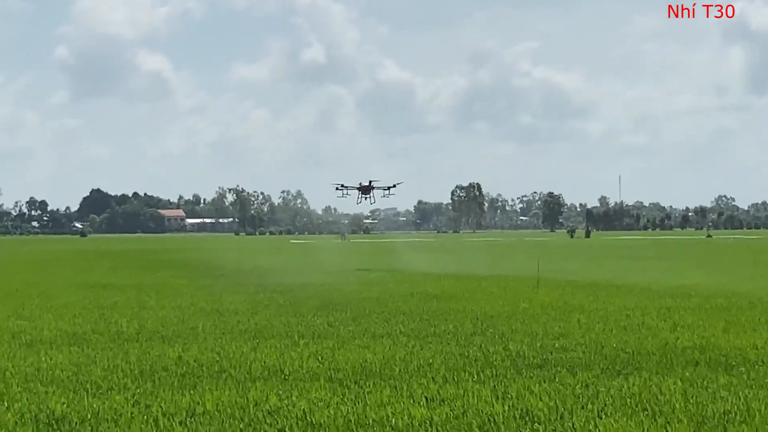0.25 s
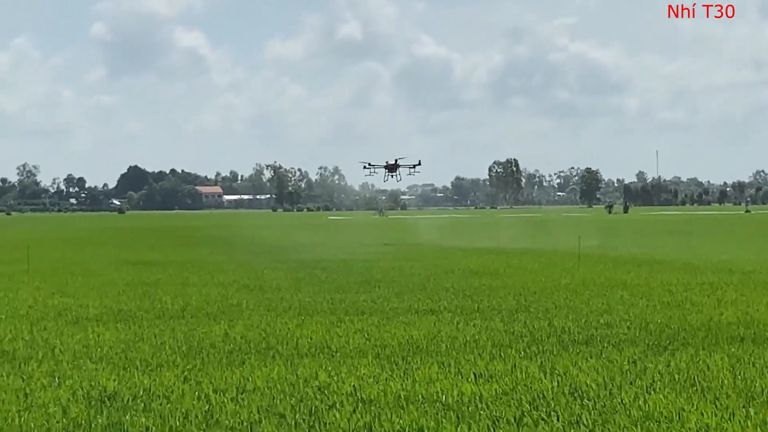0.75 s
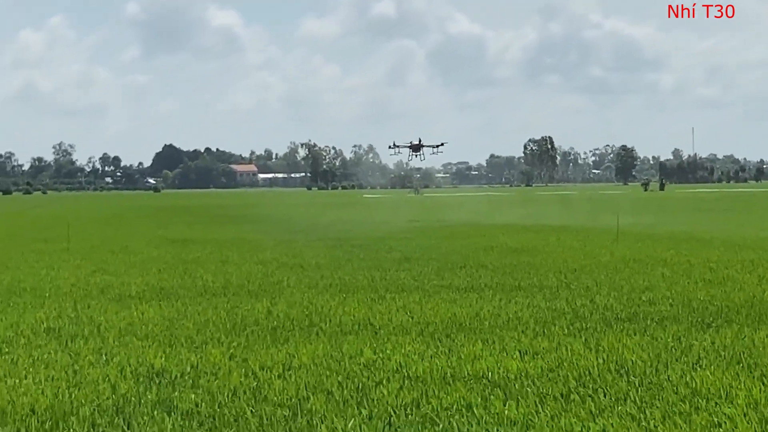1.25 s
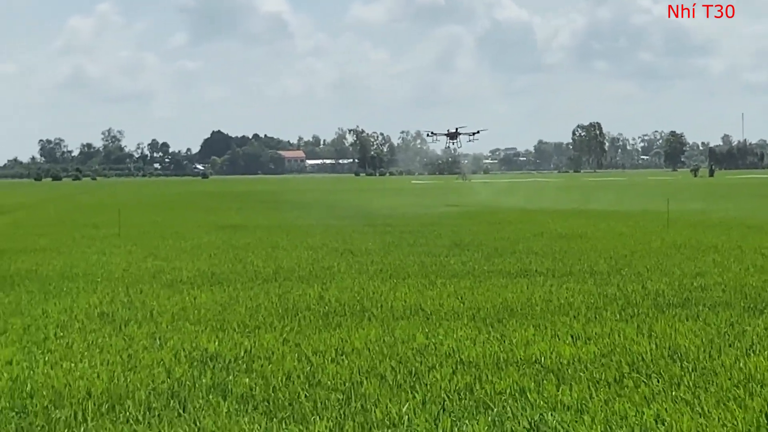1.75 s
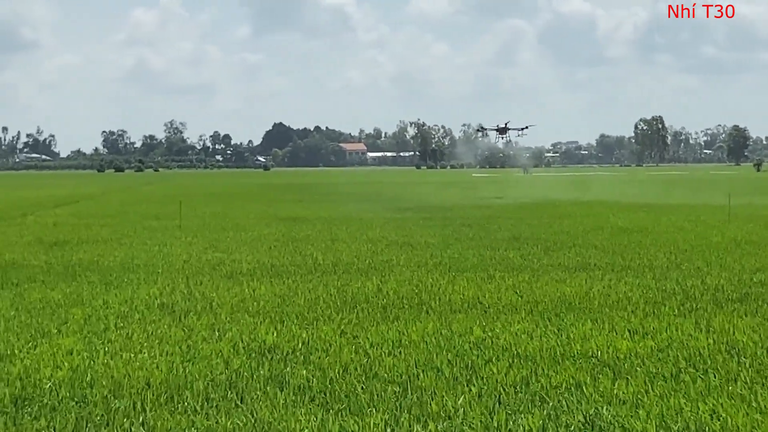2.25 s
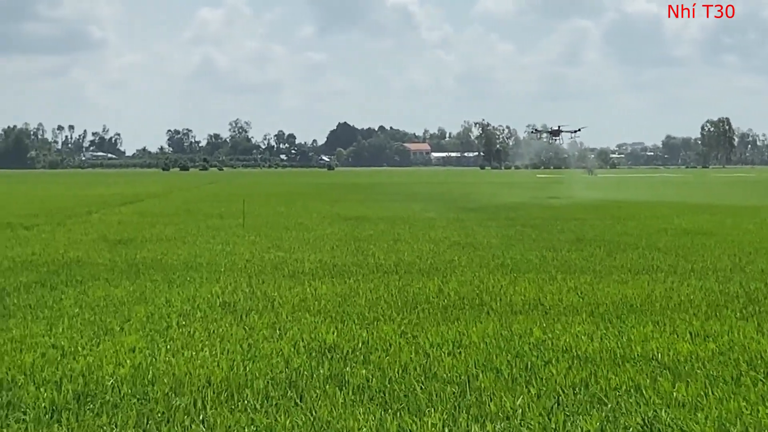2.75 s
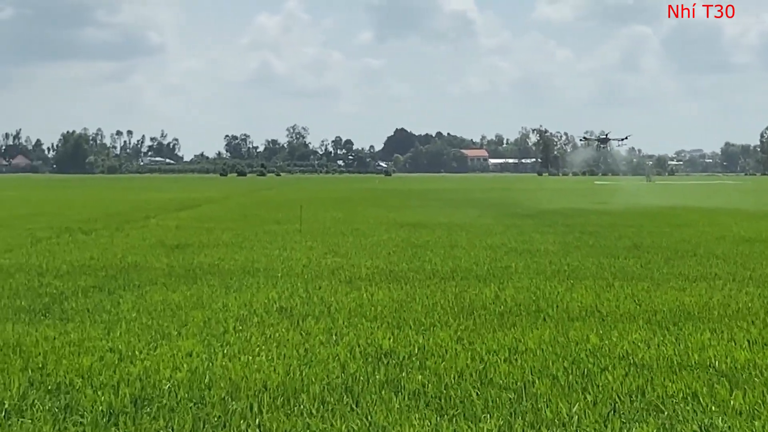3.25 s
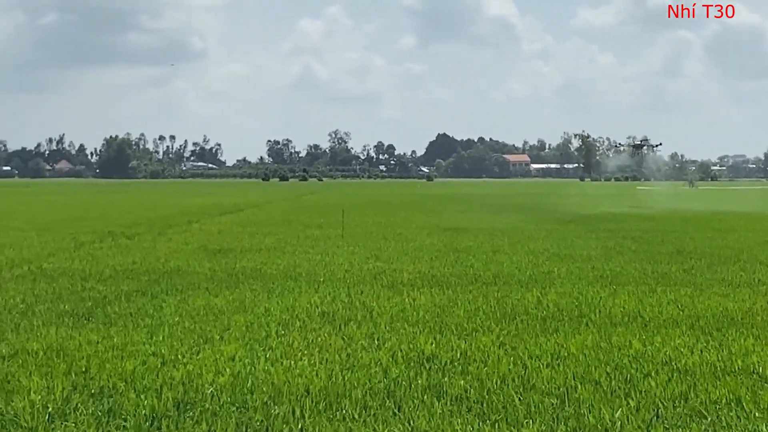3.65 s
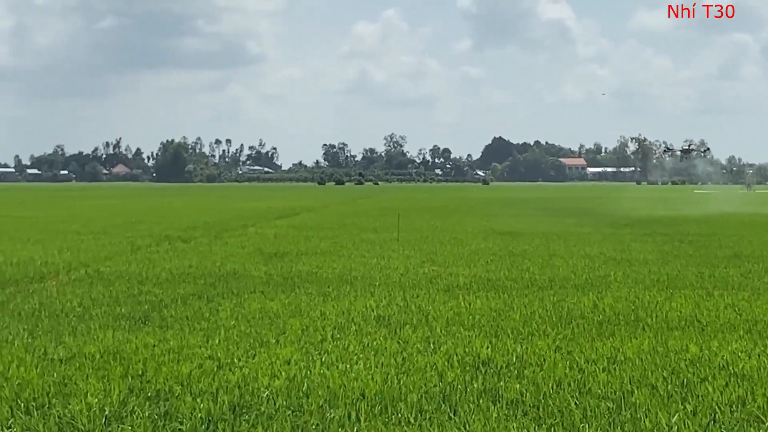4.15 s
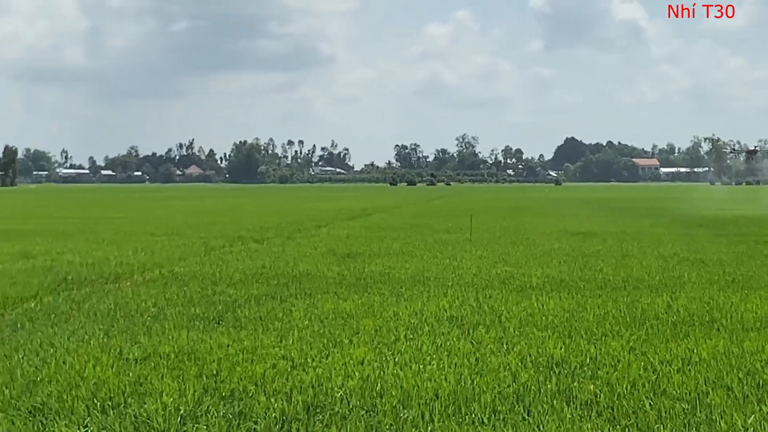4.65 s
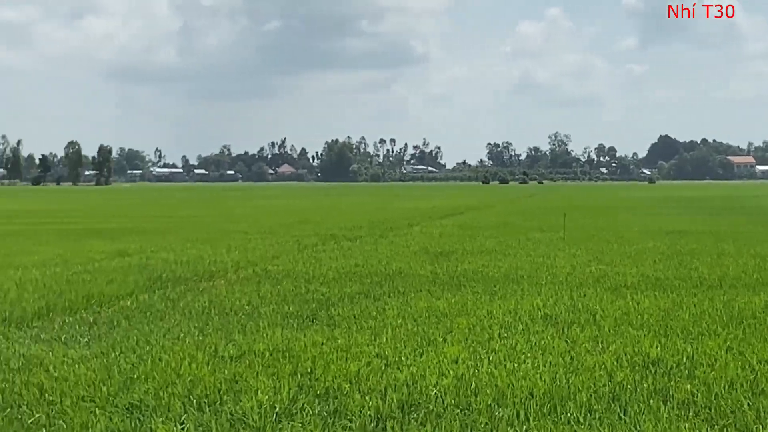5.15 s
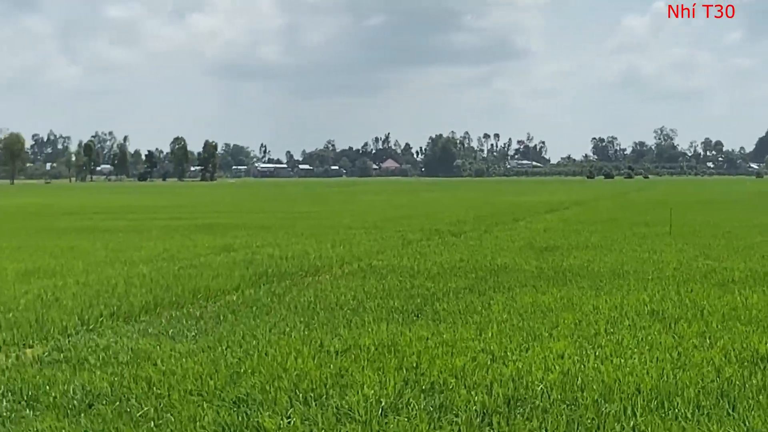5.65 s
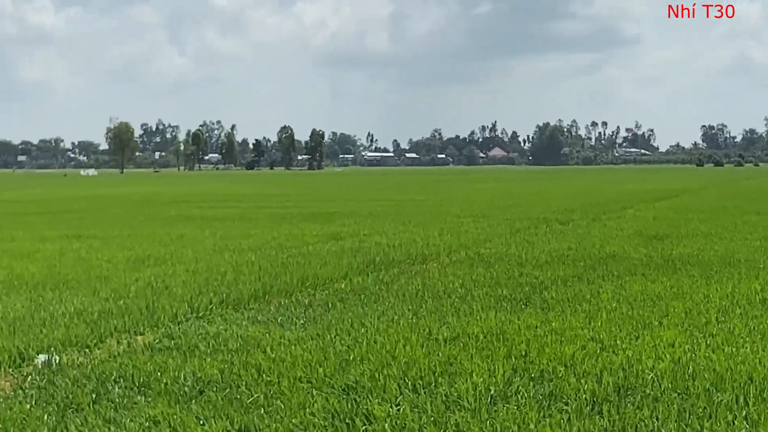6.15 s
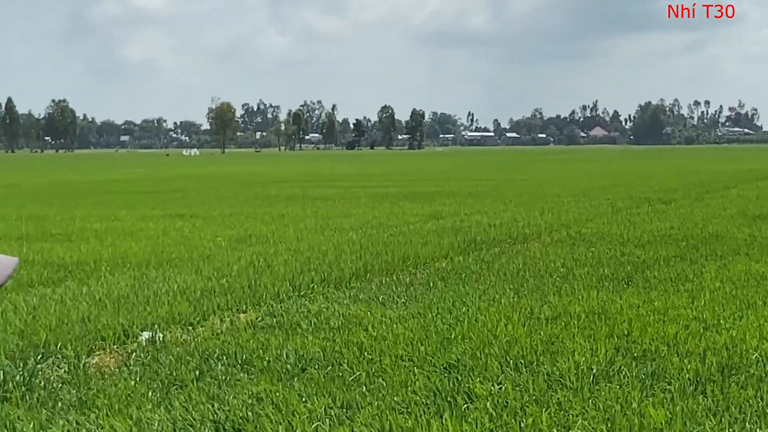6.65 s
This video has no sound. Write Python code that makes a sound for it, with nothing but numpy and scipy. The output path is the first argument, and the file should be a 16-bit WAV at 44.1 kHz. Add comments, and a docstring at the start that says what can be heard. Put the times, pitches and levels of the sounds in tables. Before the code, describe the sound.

Wind thumps on the microphone while a nearby generator engine runs evenly and a far-off spray drone faintly whirrs.

```python
"""A rice field, with a spray drone working its way across it far off. Close by runs a small single-cylinder
four-stroke engine, probably its charging generator: each firing pulses the exhaust and shakes the casing,
piston and valves knock, the cooling fan hisses. The drone's rotors add a faint wavering whirr and a rush
of downwash, and gusts buffet the microphone's two ports."""
import sys
import numpy as np
from scipy import signal
from scipy.fft import rfft, irfft, next_fast_len
from scipy.io import wavfile
from scipy.ndimage import uniform_filter1d, map_coordinates

SR = 44100
rng = np.random.default_rng(int(sys.argv[2]) if len(sys.argv) > 2 else 0)


def to_wav(sig):
    """Store sig (one row per channel, or 1-D mono) as 16-bit WAV at the path in sys.argv[1].

    Samples outside -1..1 are clipped; the rate is SR.
    """
    pcm = np.clip(np.atleast_2d(sig), -1, 1) * 32767
    pcm = np.round(pcm).astype(np.int16)
    wavfile.write(sys.argv[1], SR, pcm.T)  # frames by channels


N = 303849


# Governed engine speed: t/s, speed/rpm
ENGINE_SPEED = [(0.0, 3692.8), (0.3, 3675.2), (0.9, 3681.5), (1.2, 3670.5), (2.1, 3678.2), (2.8, 3691.1),
                (3.9, 3699.4), (4.2, 3661.8), (4.6, 3671.5), (5.4, 3653.8), (5.7, 3679.0), (6.0, 3672.3),
                (6.89, 3675.5)]

def engine_cycle():
    """Running count of engine cycles: a four-stroke fires once every two revolutions."""
    rpm, = in_time(ENGINE_SPEED)
    return np.cumsum(rpm / 120) / SR


# Exhaust note: multiple of the firing rate, relative level/dB
EXHAUST_PARTIALS = [(1, -17), (2, -20.5), (3, -13), (4, -9.5), (5, -5.5), (6, -6.5), (7, 1.5), (8, -10),
                    (9, -13), (10, 2), (11, -4.5), (12, -18), (13, -9.5), (14, -12), (15, -20.5),
                    (16, -18.5), (17, -12), (18, -13.5), (19, -31.5), (20, -13.5), (21, -25.5), (22, -21.5),
                    (23, -16), (24, -25.5), (25, -17.5), (26, -12.5), (27, -23.5), (28, -25), (30, -22.5),
                    (35, -14), (38, -26.5), (39, -24), (48, -17.5), (59, -29.5)]

def exhaust(cycle, uneven_db=-0.15, waver_db=0.62, thump_partials=5):
    """Each firing gives a dull thump and a gas pulse that the silencer rings with and draws out."""
    thump_at, pulse_at, sweep = .29, .411, .0051    # in cycles
    ring_phase, out = silencer_phase(), 0
    for order, db in EXHAUST_PARTIALS:
        k = round(order)
        if k <= thump_partials:
            angle = 2 * np.pi * k * (cycle - thump_at)
        else:    # low partials leave the pipe last
            angle = 2 * np.pi * (k * (cycle - pulse_at) + sweep * k * k) + ring_phase[k]
        out = out + from_db(db + waver_db * k / 10 * drift(5)) * np.cos(angle)
    return rms_one(out * from_db(uneven_db * drift(30)))


def silencer_phase():
    """The silencer's ring is causal, so the partials' phases follow from their levels."""
    level_db = np.interp(np.arange(65), *np.transpose(EXHAUST_PARTIALS))
    cepstrum = irfft(np.log(from_db(level_db)))
    return 2 * rfft(cepstrum[:len(cepstrum) // 2], len(cepstrum)).imag


# Tone of the casing's rattle: f/Hz, relative level/dB
RATTLE_SPECTRUM = [(120, -2.5), (450, -15), (620, -17.5), (760, -5), (950, -0.5), (1300, -0.5),
                   (1650, -2.5), (2050, 0.5), (2330, -4), (2780, -1.5), (3200, -13.5), (4600, -14.5),
                   (8000, -20.5), (15000, -37)]

def casing(cycle, fires_at=0.96, rise_cycles=0.096, floor=.25, uneven_db=0.4, knock_db=-9.0):
    """Combustion shakes the casing into a burst of rattle that dies away through the cycle."""
    since_firing = (cycle - fires_at) % 1
    age = since_firing / rise_cycles
    burst = floor + age / (1 + age ** 2) * (1 - since_firing) * from_db(uneven_db * drift(30))
    rattle = rms_one(stereo_noise(apart_db=-40.0) * burst * from_db(uneven_db * drift(170)))
    clatter = coloured(rattle + from_db(knock_db) * knocks(cycle), RATTLE_SPECTRUM)
    return rms_one(filtered(clatter, panels))


# Piston and valve hits: place in the cycle (0-1), relative level/dB
KNOCK_PATTERN = [(.02, 0.5), (.08, -4), (0.131, -5), (.68, 0.5), (0.879, 8)]

def knocks(cycle, uneven_db=1.5, jitter_s=.00005, ring_s=0.018):
    """The same knocks in every cycle, never equally hard, set the casing's dense modes ringing."""
    clicks, cycle_starts = np.zeros(N), np.arange(int(cycle[-1]))
    for place, db in KNOCK_PATTERN:
        late, force = rng.standard_normal((2, len(cycle_starts)))
        hits = np.interp(cycle_starts + place, cycle, np.arange(N)) + late * jitter_s * SR
        clicks[np.clip(hits.astype(int), 0, N - 1)] += from_db(db + uneven_db * force)
    age = np.arange(SR // 10) / SR
    ring = rng.standard_normal(len(age)) * from_db(-60 * age / ring_s)
    return rms_one(signal.fftconvolve(clicks, ring)[:N])


# Ringing panels: f/Hz, width/Hz, level/dB relative to the rattle
PANEL_MODES = [(796, 14, 5.5), (1470, 17, 6), (1817, 14, -9), (4630, 390, -5.5), (6810, 52, 4.5)]

def panels(hz):
    """Response of the casing's panels, whose resonances stand out of the rattle."""
    return 1 + sum(from_db(db) / (1 + 2j * (hz - centre) / width) for centre, width, db in PANEL_MODES)


# Airy top of fan, rotor wash and spray: f/Hz, relative level/dB
HISS_SPECTRUM = [(150, 8.5), (700, 8.5), (2000, 3), (3300, 3), (5000, 1.5), (7000, 1), (8500, -2),
                 (10000, -4.5), (12000, -9), (16000, -9)]

def hiss(cycle, throb=0.1, flutter_db=.5):
    """Rushing air flutters and throbs a little with the engine."""
    pulsing = 1 + throb * np.cos(2 * np.pi * (cycle - .2))
    air = coloured(stereo_noise(apart_db=-17.0), HISS_SPECTRUM)
    return from_db(flutter_db * drift(14)) * pulsing * air


def swells(engine, count=16, low_hz=500, high_hz=6800, q=25, share_db=-16.0, swings_per_s=2.01):
    """Narrow bands of the engine sound rise and sink a little at random."""
    out = engine
    for hz in np.geomspace(low_hz, high_hz, count):
        band = signal.lfilter(*signal.iirpeak(hz, q, fs=SR), engine)
        out = out + band * from_db(share_db) * np.tanh(drift(swings_per_s))
    return out


# Passing whines: peak t/s, half length/s, f/Hz, width/Hz, level/dB of the added band
WHINE_CUES = [(1.26, 0.17, 6700, 140, 1), (4.25, .4, 4450, 200, -3), (5.3, 0.6, 1165, 21, 3)]

def whines(engine):
    """Each whine is a narrow band of the engine's noise that swells and fades."""
    t, out = np.arange(N) / SR, engine
    for peak_s, half_s, hz, width, db in WHINE_CUES:
        band = signal.lfilter(*signal.iirpeak(hz, hz / width, fs=SR), engine)
        out = out + band * from_db(db) * np.exp(-.5 * ((t - peak_s) / half_s) ** 2)
    return out


# Long gusts: start t/s, hold/s, level/dB
GUSTS = [(-.15, .15, -29.5), (2.02, 0.59, -30), (5.05, 0.51, -28)]
# Single eddies hitting the microphone: t/s, half length/s, rumble level/dB, puff level/dB
EDDY_HITS = [(.02, .03, -23, -33), (.19, 0.028, -26, -38), (1.28, .03, -31, -42),
             (2.027, 0.016, -22.5, -42), (2.19, .025, -27, -42), (2.318, .02, -22.5, -42),
             (2.49, .02, -25, -42), (2.62, .027, -29, -27), (2.837, .018, -29, -18), (3.01, .018, -24, -42),
             (3.3, 0.027, -23.5, -44), (3.37, .03, -28, -31), (3.527, .02, -26, -42),
             (3.7, 0.029, -21.5, -33), (3.94, 0.024, -27, -36), (4.59, .02, -27, -38),
             (5.188, 0.021, -28, -38), (5.6, .04, -30, -30), (5.765, .018, -32, -26)]
# Low rumble of wind on the ports: f/Hz, relative level/dB
RUMBLE_SPECTRUM = [(12, -50), (28, -21), (40, -5), (58, 5), (80, -.5), (105, -4.5), (150, -24),
                   (300, -23.5), (700, -43), (4000, -100)]
# A sharp puff, reaching higher: f/Hz, relative level/dB
PUFF_SPECTRUM = [(15, -48), (60, -9), (90, -0.5), (140, -14), (240, -16.5), (330, -31), (700, -57),
                 (4000, -100)]

def wind(breeze_db=-34, rise_s=0.16, fall_s=.25, gust_puff_db=-10, lumpy_db=3.5, steady_s=0.045):
    """Breeze and gusts rumble unevenly on the ports; eddies thump, the sharpest with a brighter puff."""
    t, gusts, out = np.arange(N) / SR, 0, 0
    for start, hold, db in GUSTS:
        corners = start + np.cumsum([0, rise_s, hold, fall_s])
        gusts = gusts + from_db(db) * np.interp(t, corners, [0, 1, 1, 0])
    lumps = from_db(lumpy_db * np.tanh(drift(15.0)))
    rumble = np.hypot(from_db(breeze_db), gusts) * lumps
    puffs = from_db(gust_puff_db) * gusts * lumps
    for peak_s, half_s, rumble_db, puff_db in EDDY_HITS:
        passing = np.exp(-.5 * ((t - peak_s) / half_s) ** 2)
        rumble = np.hypot(rumble, from_db(rumble_db) * passing)
        puffs = np.hypot(puffs, from_db(puff_db) * passing)
    for spectrum, envelope in ((RUMBLE_SPECTRUM, rumble), (PUFF_SPECTRUM, puffs)):
        turbulence = coloured(stereo_noise(apart_db=-12.0), spectrum)
        power = uniform_filter1d(np.mean(turbulence ** 2, axis=0), int(steady_s * SR))
        out = out + envelope * turbulence / np.sqrt(power + 1e-6)    # the envelope alone rides the level
    return out


# The drone's flight: t/s, blade-pass f/Hz, whirr level/dB
DRONE_FLIGHT = [(0, 77.5, -51), (1.3, 75, -43), (1.95, 75, -38), (2.45, 73.5, -45), (3.2, 75.5, -58),
                (6.89, 76, -67)]
# Tone of the whirr: f/Hz, relative level/dB
WHIRR_SPECTRUM = [(75, -28), (230, 2), (530, 4), (680, -3), (760, 14), (850, -3), (1100, 4), (1500, 3),
                  (2300, -13)]

def rotors(count=6, mismatch=.004, wander=.003, fading_db=0.5):
    """Each rotor is trimmed to its own speed; moving air makes the far whirr swell and fade."""
    blade_hz, level_db = in_time(DRONE_FLIGHT)
    orders, one_pass, out = np.arange(1, 31), np.linspace(0, 1, 1024), 0
    gains = from_db(at_hz(WHIRR_SPECTRUM, orders * blade_hz.mean()))
    for trim in np.linspace(-1, 1, count):
        passes = np.cumsum(blade_hz * (1 + mismatch * trim + wander * drift(3))) / SR
        phases = rng.random((len(orders), 1))
        blade_pulse = gains @ np.cos(2 * np.pi * (np.outer(orders, one_pass) + phases))
        out = out + np.interp(passes % 1, one_pass, blade_pulse) * from_db(fading_db * drift(3.6))
    return from_db(level_db) * rms_one(out)


# Background bed of downwash, scattered by the field: f/Hz, relative level/dB
DOWNWASH_SPECTRUM = [(100, -9), (450, -2), (620, -6), (780, 1.5), (1000, -4), (1500, -3.5), (2200, -12),
                     (3500, -31), (8000, -91)]

def downwash(level_db=-38.5):
    """The drone's far rush arrives from all over the field, so each port hears its own noise."""
    return from_db(level_db) * coloured(rng.standard_normal((2, N)), DOWNWASH_SPECTRUM)


# Stereo phase by frequency: f/Hz, lead of the right/rad
STEREO_PHASE = [(0, 0), (300, 1.3), (600, 2.3), (1150, 3.0), (1400, 4.1), (1810, 5.4), (3500, 6.28),
                (7500, 6.28), (9000, 9.4), (15500, 19)]
# Stereo balance: f/Hz, left minus right level/dB
STEREO_BALANCE = [(100, 8), (210, -1), (330, -1.5), (500, -1.5), (770, -7.5), (1300, -7), (1800, -3.5),
                  (2300, -0.5), (15000, 0)]

def stereo_image(x):
    """Right is ahead in the lows and mids; the treble is centred from 3.5 to 7.5 kHz, wide again above."""
    def response(hz):
        tilt = from_db(at_hz(STEREO_BALANCE, hz) / 2)    # bass leans left, mids right
        lag = np.interp(hz, *np.transpose(STEREO_PHASE))
        return np.array([tilt * np.exp(-1j * lag), 1 / tilt])
    return filtered(x, response)


def reflections(x, count=7, latest_s=.012, echo_db=-19.0):
    """A few weak echoes from things nearby ripple the spectrum."""
    lags = (rng.uniform(.1, 1, count) * latest_s * SR).astype(int)
    return x + from_db(echo_db) * sum(np.roll(x, lag, axis=-1) for lag in lags)


def mic_turn(start_db, db_per_s):
    """Slow fade as the microphone turns steadily towards a source or away."""
    return from_db(start_db + db_per_s * np.arange(N) / SR)


def stereo_noise(apart_db):
    """White noise common to both channels, plus a part of their own at apart_db."""
    return rms_one(rng.standard_normal(N) + from_db(apart_db) * rng.standard_normal((2, N)))


def drift(per_s):
    """Smooth random modulation of unit power, through per_s new values a second."""
    knots = rng.standard_normal(4096)
    positions = np.arange(0, N + 64, 64) * per_s / SR + 2
    return rms_one(map_coordinates(knots, [positions], order=3, mode="wrap").repeat(64)[:N])


def coloured(x, spectrum):
    """EQ x with a spectrum table, then scale to unit power."""
    return rms_one(filtered(x, lambda hz: from_db(at_hz(spectrum, hz))))


def filtered(x, response):
    """Pass x through a response given as a function of frequency."""
    size = next_fast_len(N + SR // 4, real=True)
    hz = np.arange(size // 2 + 1) * SR / size
    return irfft(rfft(x, size) * response(hz), size)[..., :N]


def at_hz(points, hz):
    """Read a spectrum on a log-frequency axis."""
    f, value = np.transpose(points)
    return np.interp(np.log(np.maximum(hz, 1)), np.log(f), value)


def in_time(rows):
    """The columns of an automation curve, at every sample."""
    times, *columns = np.transpose(rows)
    return [np.interp(np.arange(N) / SR, times, column) for column in columns]


def from_db(db):
    """Decibels to gain."""
    return 10 ** (np.asarray(db) / 20)


def rms_one(x):
    """Scale to unit power."""
    return x / np.sqrt(np.mean(x ** 2) + 1e-20)


def scene():
    """The mix: engine up front, drone far back, wind on the microphone."""
    cycle = engine_cycle()
    rattle = mic_turn(start_db=-35, db_per_s=0.49) * casing(cycle)
    air = mic_turn(start_db=-34.5, db_per_s=-0.74) * hiss(cycle)
    clatter = reflections(rattle + air)
    exhaust_note = mic_turn(start_db=-23.5, db_per_s=-0.39) * exhaust(cycle)
    engine = whines(swells(exhaust_note + clatter))
    return stereo_image(engine + rotors()) + downwash() + wind()


def record(dry):
    """The deepest bass is rolled off and the top is cut steeply."""
    low_cut = signal.butter(3, 32, "high", fs=SR, output="sos")
    high_cut = signal.ellip(12, .1, 90, 15850, fs=SR, output="sos")
    return signal.sosfilt(high_cut, signal.sosfilt(low_cut, dry))


dry = scene()
out = record(dry)
to_wav(out)
```